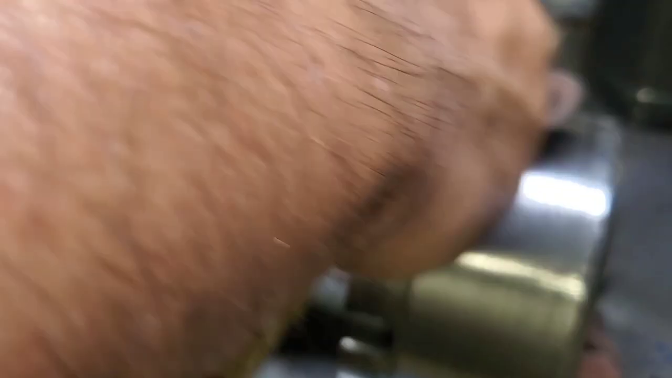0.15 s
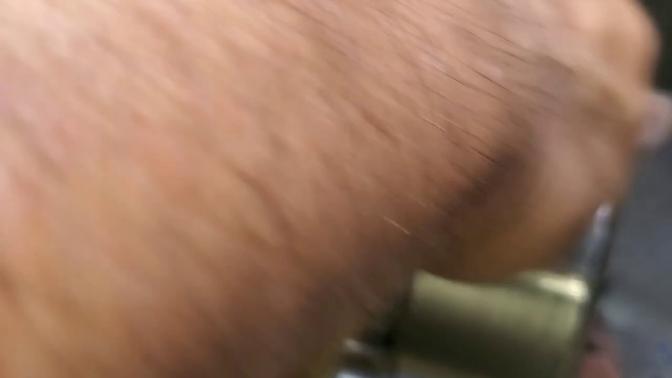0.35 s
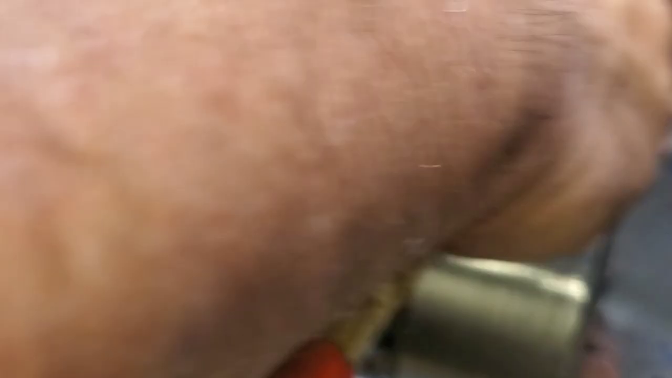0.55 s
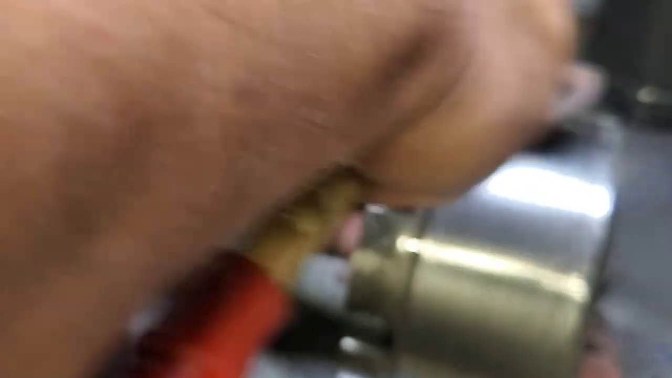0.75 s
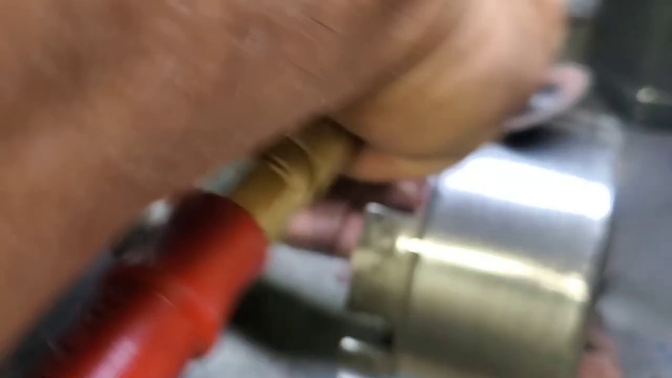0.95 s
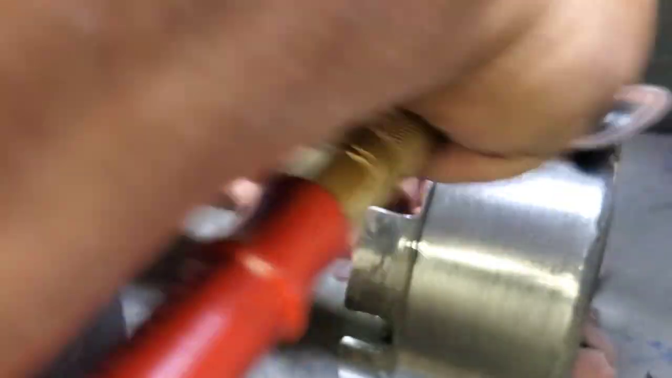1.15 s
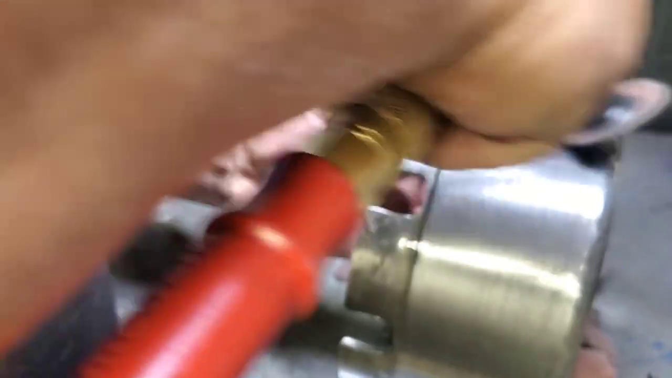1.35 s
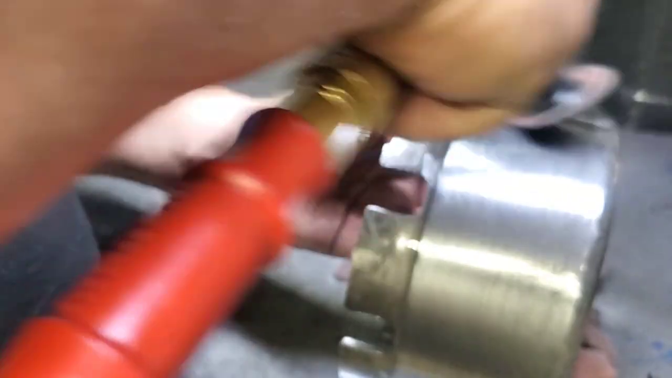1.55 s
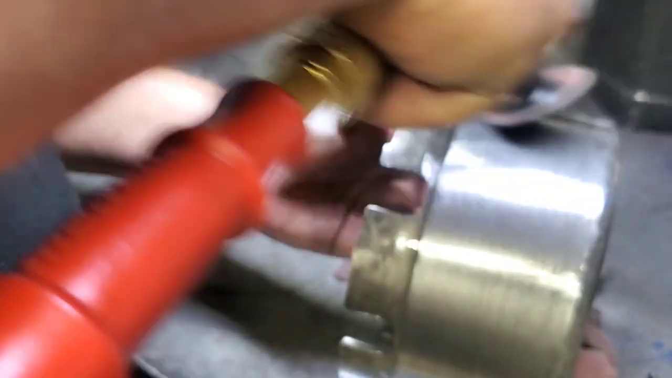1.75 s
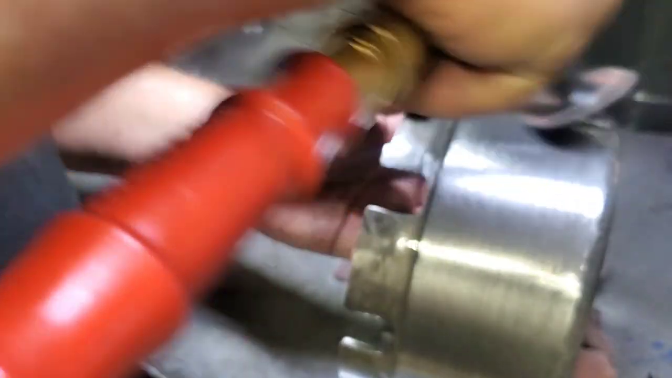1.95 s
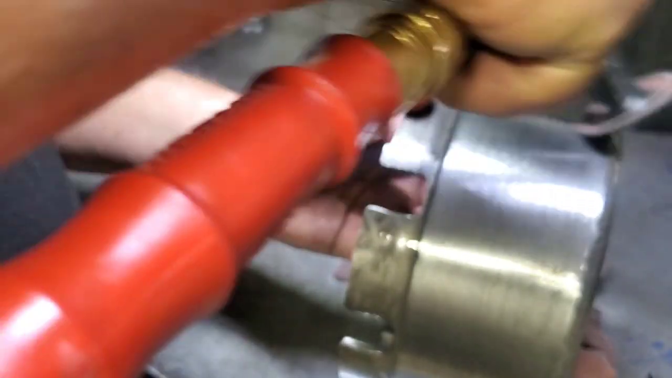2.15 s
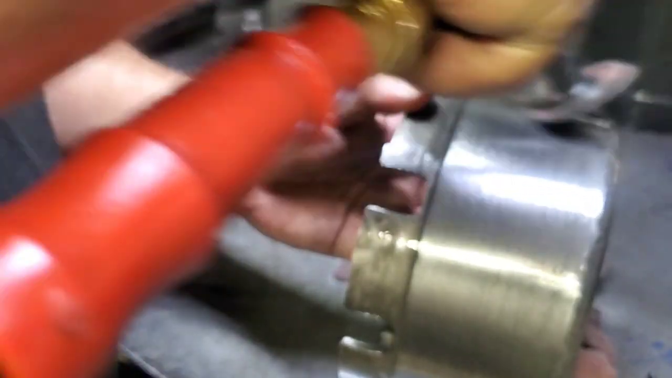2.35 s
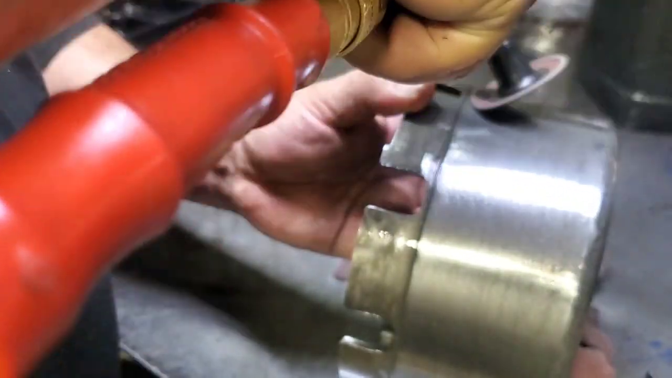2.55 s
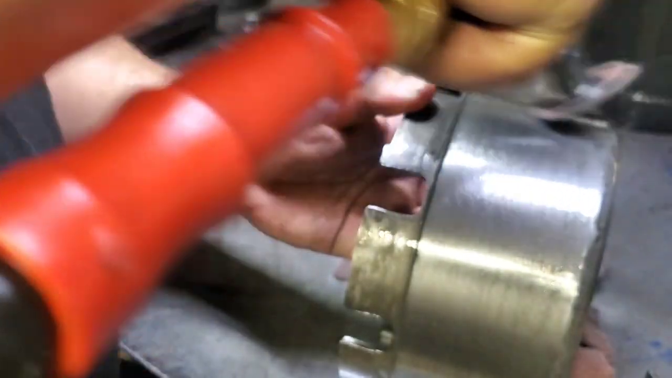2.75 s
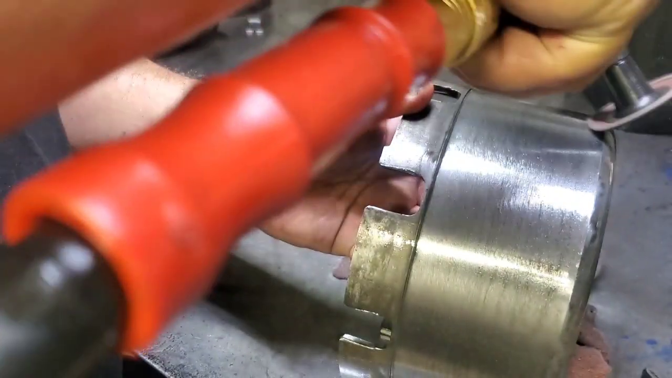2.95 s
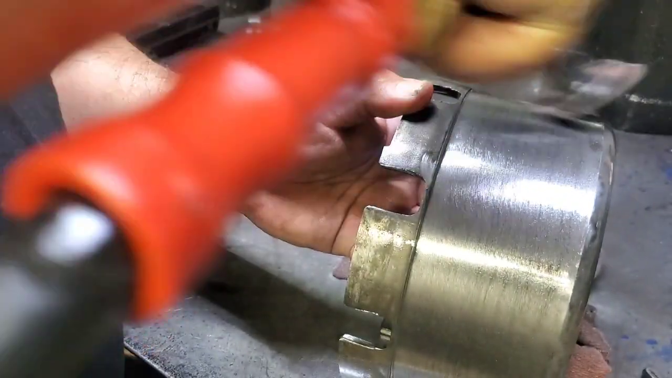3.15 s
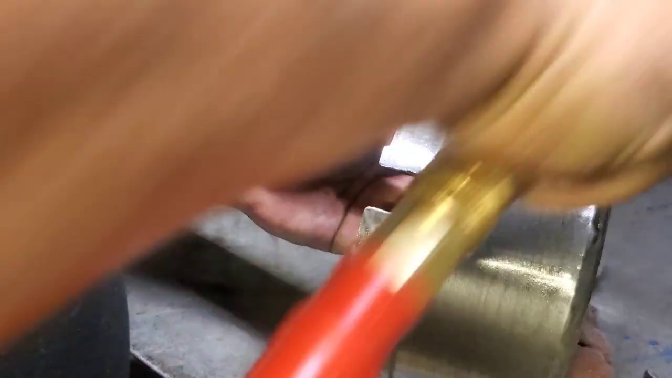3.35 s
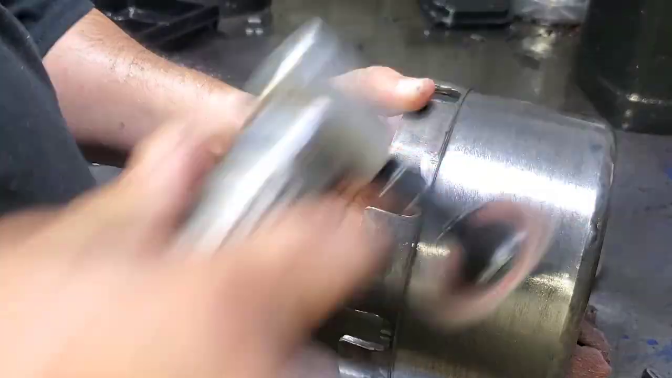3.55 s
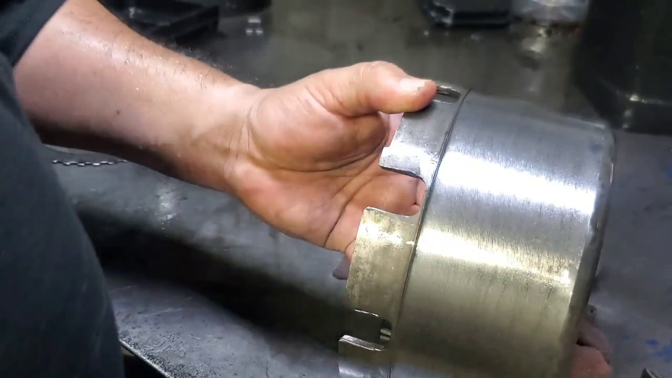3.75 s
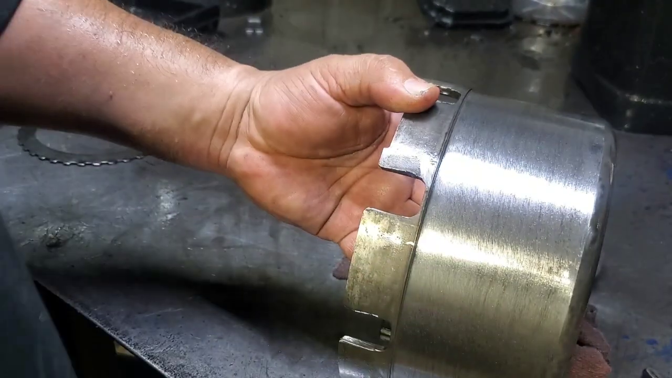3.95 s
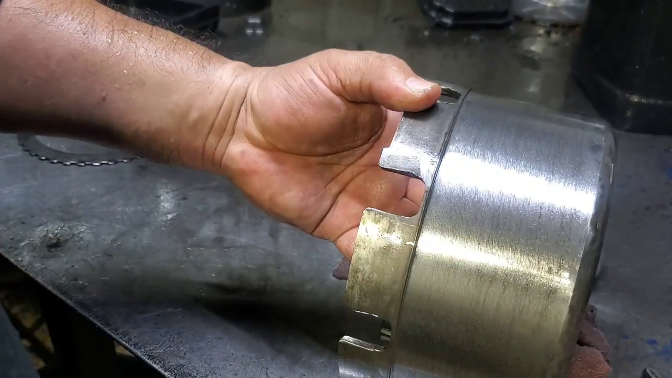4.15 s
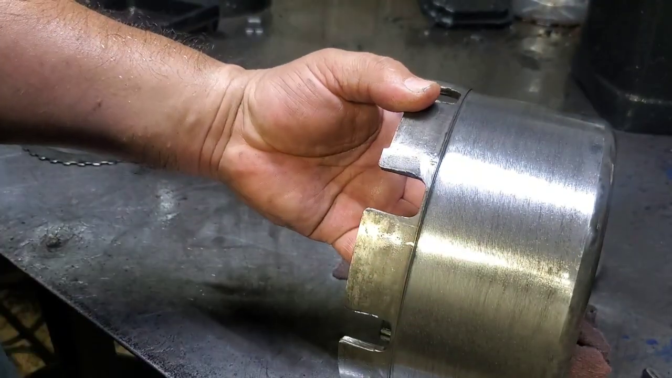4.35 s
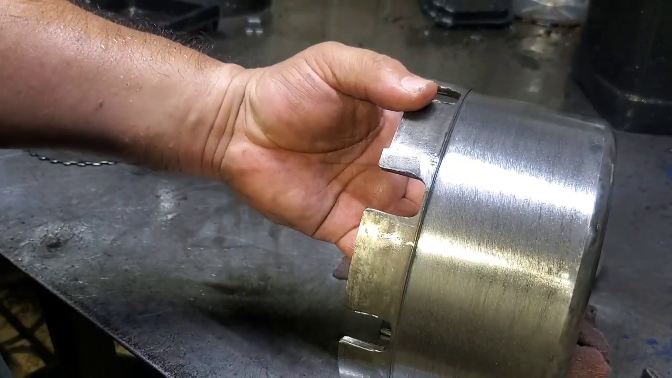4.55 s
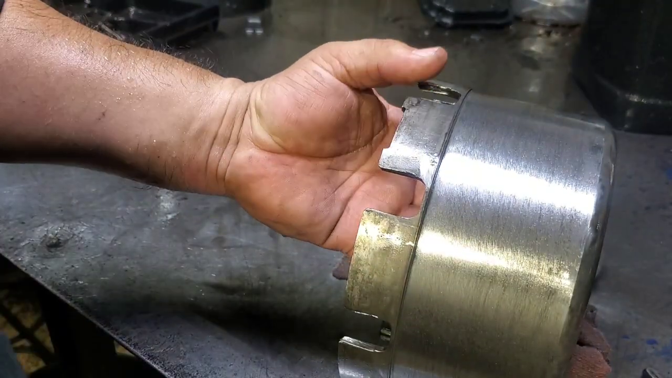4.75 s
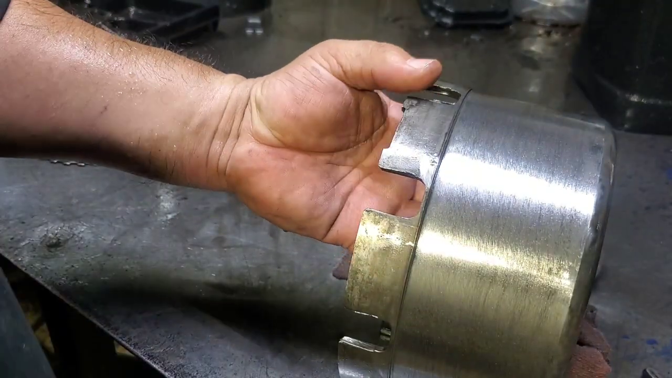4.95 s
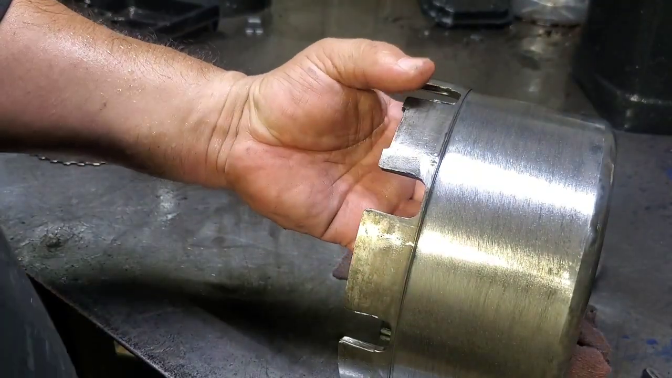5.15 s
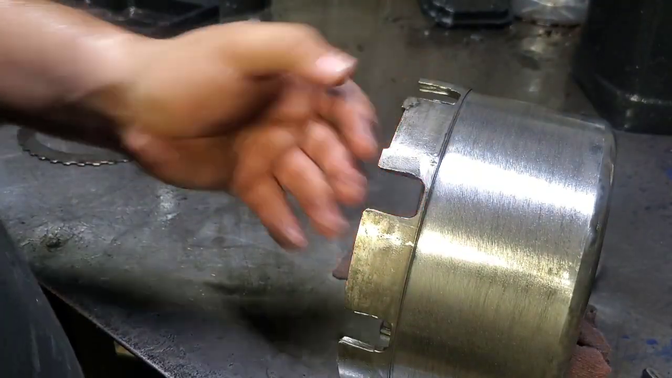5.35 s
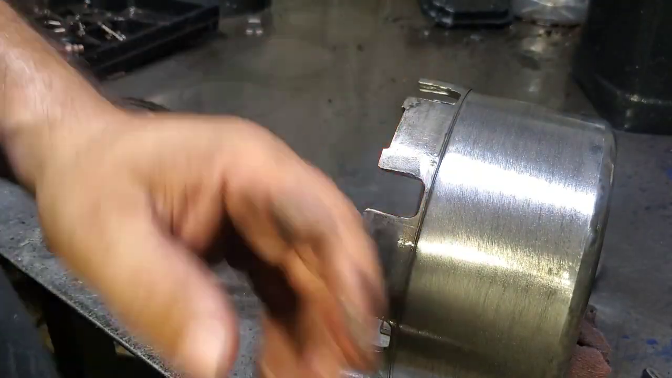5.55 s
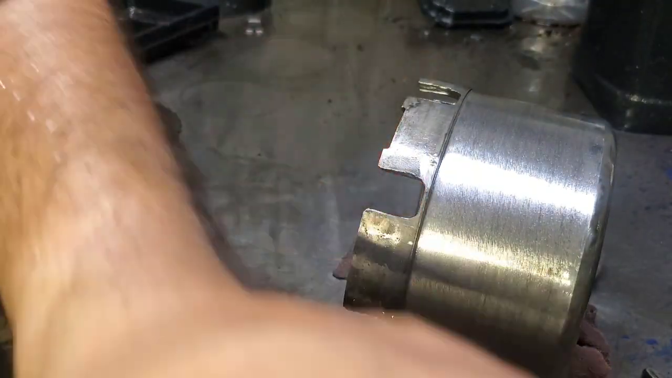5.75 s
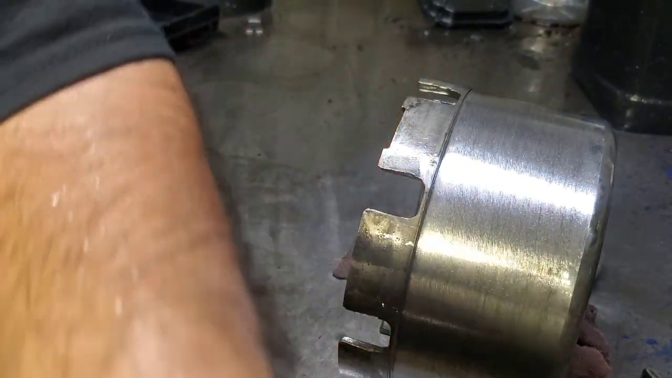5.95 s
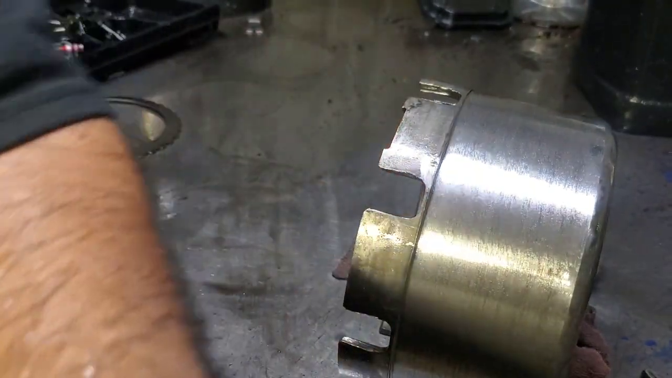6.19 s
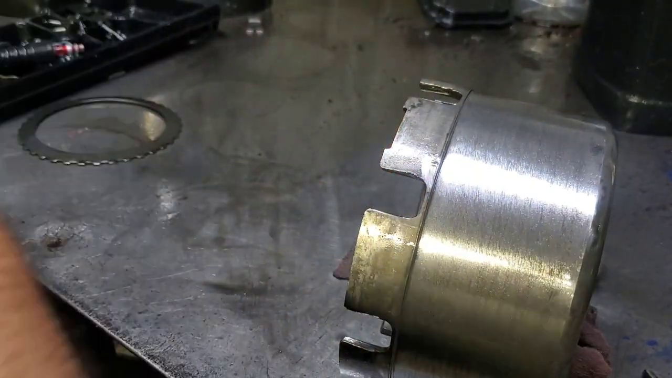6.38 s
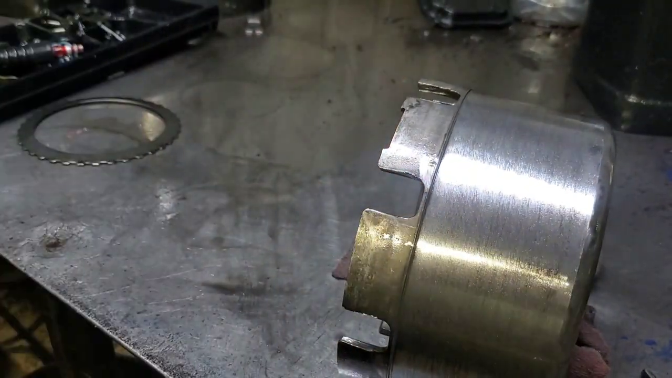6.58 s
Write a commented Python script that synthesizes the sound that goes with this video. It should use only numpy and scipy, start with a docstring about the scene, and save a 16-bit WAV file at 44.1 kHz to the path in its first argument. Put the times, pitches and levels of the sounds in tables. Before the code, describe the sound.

From 0 s a close air-driven grinder is at full noise on a steel drum: a harsh, nasal vane whine around 400 to 550 Hz with strong overtones, dipping and surging irregularly two to four times a second as pushes load it. Gritty abrasive hiss and bright exhaust jet swell with the strokes. Until about 1 s the sound is a little duller, screened by the forearm; then it opens up, with sizzle and soft low air puffs on the left until 2.9 s. At 3.28 s the lever is released; whine and hiss collapse, air bleeds away, and loose vanes rattle ever slower, with a brighter clatter near 3.9 s, ending by 4.25 s. Quiet follows. From roughly 4.5 to 5 s automatic gain raises the workshop's steady hiss and rumble, leaning left. Small scuffs come at 5.8 s and 5.9 to 6.5 s, with a barely audible low hum.

```python
"""In a workshop, an air die grinder is swept to and fro over a steel drum against far hiss and rumble.
Pushes load the vane motor, so its whine, a sum of sines locked to the rotor's phase, dips.
Exhaust air and abrasive hiss, noise chopped at the vane rate, lie above it; low puffs cross the microphone.
The lever is let go, the air bleeds off and loose vanes rattle as the rotor coasts. After a pause the
recorder turns its gain up, bringing out the workshop's rumble and hiss, a few scuffs and a faint low hum."""
import sys
import numpy as np
from scipy import signal
from scipy.fft import rfft, irfft, next_fast_len
from scipy.io import wavfile
from scipy.ndimage import uniform_filter1d, map_coordinates

SR = 44100
rng = np.random.default_rng(int(sys.argv[2]) if len(sys.argv) > 2 else 0)


def log_audio(samples):
    """Write samples as a 16-bit WAV file to the path given in sys.argv[1]."""
    # one column per channel
    frames = np.atleast_2d(samples).T
    # limit to full scale, then quantise
    limited = np.clip(frames, -1, 1)
    pcm = np.round(limited * 32767).astype(np.int16)
    wavfile.write(sys.argv[1], SR, pcm)


N = 291942
TIME = np.arange(N) / SR   # s
SIDES = np.array([[1], [-1]])   # left, right


def amp(db):
    """Decibel law: 20 dB is a tenfold amplitude."""
    return 10 ** (np.asarray(db) / 20)


def rms_one(x):
    """Energy normalization: the root mean square becomes 1."""
    return x / np.sqrt(np.mean(x ** 2) + 1e-20)


def in_time(rows):
    """Linear interpolation of each column against time, sample by sample."""
    s, *columns = np.transpose(rows)
    return [np.interp(TIME, s, column) for column in columns]


def at_hz(points, hz):
    """Interpolation of a spectrum on a logarithmic frequency axis."""
    table_hz, values = np.array(points).T[:2]
    return np.interp(np.log(hz + 1), np.log(table_hz), values)


def drift(rate_hz):
    """Slow random modulation: low-passed white noise of rms 1."""
    step = 40   # samples between the slow values
    r = np.exp(-2 * np.pi * rate_hz * step / SR)
    white = rng.standard_normal(N // step + 2002)
    slow = signal.lfilter([1], [1, -2 * r, r * r], white)[2000:]   # past the filter's onset
    return np.interp(np.arange(N) / step, np.arange(len(slow)), rms_one(slow))


def noise(spectrum, likeness, balance):
    """Partial coherence: shared and opposed noise make a coloured stereo field of rms 1."""
    size = next_fast_len(N)
    hz = np.arange(size // 2 + 1) * SR / size
    mid, side = rfft(rng.standard_normal((2, size))) * amp(at_hz(spectrum, hz))
    alike = np.clip(at_hz(likeness, hz), 0, 1)
    both = np.sqrt(1 + alike) * mid + np.sqrt(1 - alike) * side * SIDES
    both *= amp(SIDES * at_hz(balance, hz) / 2)
    return rms_one(irfft(both, size)[:, :N])


def band(hz, width, alike):
    """Resonance: stereo noise passes twice through one damped pole pair; rms 1."""
    r = np.exp(-np.pi * width / SR)
    mid, side = rng.standard_normal((2, N))
    x = mid + np.clip(1 - alike, 0, 1) * side * SIDES
    section = [1, 0, -1, 1, -2 * r * np.cos(2 * np.pi * hz / SR), r * r]
    return rms_one(signal.sosfilt([section, section], x))


def placed(x, pan_db, lead_ms):
    """Interaural level and time difference: a positive pan and lead favour the left."""
    late = map_coordinates(x[1], [np.arange(N) - lead_ms * SR / 1000], order=3, mode="nearest")
    return np.array([x[0] * amp(pan_db / 2), late * amp(-pan_db / 2)])


# background levels: t/s, leak level/dB, rumble level/dB
BACKGROUND = [(0, -43, -54), (1, -59, -50), (3.2, -70, -56), (3.7, -54, -52), (4.4, -55.5, -57.5),
              (5.1, -54.5, -57), (5.9, -55, -54.5), (6.25, -55.5, -58.5), (6.62, -62, -63)]
# noise colours: f/Hz, relative level per Hz/dB
SHOP_HISS_SPECTRUM = [(76, -28), (130, 4.5), (318, -2), (400, -6), (520, -14.5), (680, -2), (1000, -1.5),
                      (1350, -2), (1600, 0.5), (2020, 5.5), (2800, 3), (3490, -1.5), (3960, 3), (5500, -11),
                      (7150, -37)]
AIR_LINE_LEAK_SPECTRUM = [(3000, -19), (5000, -3), (5700, -8), (6900, 1.5), (8200, -6), (9100, -1),
                          (11000, -6), (13500, -4), (15200, -4), (16500, -6.5)]
RUMBLE_SPECTRUM = [(15, -38), (30, -3), (70, -3), (110, -4.5), (160, -32), (300, -25.5)]
# left-right likeness of the shop: f/Hz, likeness (1 = identical)
SHOP_LIKENESS = [(60, 1), (400, 0.99), (1000, 0.78), (2000, 0.44), (4000, 0.21), (8000, 0.051)]
# balance of the shop noise: f/Hz, left minus right level/dB
SHOP_BALANCE = [(60, 1), (110, -0.5), (200, 0), (380, 5), (700, 1), (1290, 2), (2380, 2.5), (4400, 2.5),
                (8120, 4.5), (15000, 4.5)]
# far machines: f/Hz, mean peak level/dB
SHOP_TONES = [(1027, -63.5), (31.3, -67.5)]
# breathy bands in the hiss: f/Hz, width of one resonance/Hz, level before the lean/dB, late loss/dB
SHOP_BANDS = [(2810, 81, -67.5, 0.1), (4030, 400, -66, 8), (1970, 400, -70, 0.1)]
# scuffs on the bench and a faint low hum near 363 Hz:
# centre t/s, length/s, f/Hz, width of one resonance/Hz, level before the lean/dB
SCUFFS_AND_HUM = [(5.79, 0.068, 1100, 1200, -50), (5.798, .04, 377, 140, -61), (6.1, 0.5, 1866, 380, -56),
                  (6.1, 0.5, 2850, 350, -57.5), (6.376, 0.03, 350, 1200, -53),
                  (6.448, 0.25, 2344, 370, -59), (6.52, 0.3, 40, 70, -58), (6.05, 0.45, 363, 30, -72)]
SHOP_HISS_DB, BANDS_SHIFT_S = -52.5, 4.4
SHOP_PAN_DB, SHOP_LEAD_MS = 6, 0.28   # the pan leans the bands, scuffs and hum; the lead serves all layers


def workshop():
    """Superposition: coloured noises, wavering tones, breathy bands, short swells of scuffing and hum."""
    leak_db, rumble_db = in_time(BACKGROUND)
    lean = amp(SIDES * SHOP_PAN_DB / 2)
    out = amp(SHOP_HISS_DB + .6 * drift(8)) * noise(SHOP_HISS_SPECTRUM, SHOP_LIKENESS, SHOP_BALANCE)
    out += amp(leak_db + .8 * drift(8)) * noise(AIR_LINE_LEAK_SPECTRUM, SHOP_LIKENESS, SHOP_BALANCE)
    out += amp(rumble_db + 2 * drift(14)) * noise(RUMBLE_SPECTRUM, SHOP_LIKENESS, SHOP_BALANCE)
    for hz, level_db in SHOP_TONES:
        out += amp(level_db + 1.5 * drift(6)) * np.sin(2 * np.pi * hz * TIME + .5 * drift(4))
    late = np.clip((TIME - BANDS_SHIFT_S) / .1, 0, 1)
    for hz, width, level_db, lost_db in SHOP_BANDS:
        out += lean * amp(level_db - lost_db * late + drift(8)) * band(hz, width, alike=.6)
    for centre_s, length_s, hz, width, level_db in SCUFFS_AND_HUM:
        swell = np.exp(-((TIME - centre_s) / (length_s / 2)) ** 4)
        out += lean * amp(level_db + 2.2 * drift(90)) * swell * band(hz, width, alike=.6)
    return placed(out, 0, SHOP_LEAD_MS)


# exhaust puffs across the left microphone port: t one puff half-width before the crest/s, crest level/dB
PUFFS = [(1.011, -37), (1.203, -41), (1.348, -42.5), (1.444, -42), (1.62, -39.5), (1.814, -37.5),
         (2.04, -41), (2.263, -42), (2.364, -40), (2.6, -37), (2.811, -33.5)]
# colour of a puff: f/Hz, relative level per Hz/dB
PUFF_SPECTRUM = [(20, -35), (50, -8), (85, -3), (130, -14), (220, -17), (400, -56)]
PUFF_S, PUFF_PAN_DB = 0.03, 23   # Gaussian half-width at 1/e; left minus right


def puffs():
    """Turbulent pressure at a port: Gaussian gusts gate low noise, mostly unlike on the two sides."""
    gust = sum(amp(db) * np.exp(-((TIME - s - PUFF_S) / PUFF_S) ** 2) for s, db in PUFFS)
    likeness = [(20, 0.31), (400, 0.37)]
    return gust * noise(PUFF_SPECTRUM, likeness, [(20, PUFF_PAN_DB), (400, PUFF_PAN_DB)])


# speed targets, dipping as pushes load the motor: t/s, vane rate before smoothing f/Hz
SPEED = [(0, 460.5), (0.048, 354), (0.14, 549), (0.19, 641), (0.284, 482.7), (0.328, 448.7), (0.368, 461.3),
         (0.44, 576.5), (0.532, 420), (0.58, 412.4), (0.658, 441.8), (0.696, 511.6), (0.75, 547),
         (0.8, 483.4), (0.858, 308), (0.926, 406.6), (0.98, 516.5), (1.034, 430), (1.1, 228.3),
         (1.134, 296), (1.2, 468), (1.248, 552.5), (1.324, 401.6), (1.366, 349.8), (1.42, 461),
         (1.504, 550), (1.566, 471.5), (1.596, 438.4), (1.7, 513), (1.782, 543), (1.872, 427.3),
         (1.89, 407), (1.946, 508), (2.028, 561), (2.062, 577.4), (2.11, 499), (2.148, 463.6), (2.24, 555),
         (2.342, 519), (2.384, 490), (2.424, 408.3), (2.5, 490), (2.558, 542), (2.61, 501), (2.654, 422.3),
         (2.686, 383.5), (2.768, 441.5), (2.828, 526), (2.9, 470.7), (2.95, 415.6), (3.098, 539),
         (3.152, 497), (3.19, 458.5), (3.236, 305.7), (3.26, 259.2), (3.306, 366.6), (3.33, 336)]
COAST_S, CRAWL_HZ = .28, 70   # time constant of the sinking rate and the vane rate it nears
VANES = 4


def vane_rate():
    """Rotor inertia: speed changes are rounded, and the free rotor sinks exponentially to a crawl."""
    hz, = in_time(SPEED)
    coast = np.exp(-np.maximum(TIME - SPEED[-1][0], 0) / COAST_S)
    hz = CRAWL_HZ + (hz - CRAWL_HZ) * coast
    return uniform_filter1d(hz, int(0.026 * SR)) * (1 + 0.00263 * drift(26.7))


# grinding strokes, of which only the departure from the mean is used: t/s, level/dB
STROKE_SWELL = [(0.0, -25), (0.14, -23), (0.17, -21), (0.36, -22.5), (0.37, -23.5), (0.59, -22.5),
                (0.63, -27), (0.76, -22.5), (0.89, -27), (0.93, -22), (1.14, -25), (1.24, -21), (1.36, -25),
                (1.45, -21.5), (1.67, -25), (1.7, -20.5), (1.9, -25.5), (1.95, -21.5), (2.18, -24.5),
                (2.25, -21), (2.41, -26.5), (2.52, -21), (2.66, -26.5), (2.8, -22), (2.91, -26.5),
                (3.08, -22.5), (3.18, -29), (3.3, -25.5)]
# one entry each for rasp, grinding hiss, sizzle, jet: level at the mean swell at t = 0/dB
AIR_DB = [-25.5, -25, -29.5, -22.5]
# sinking while the lever is held/(dB/s)
AIR_SINK_DB_PER_S = [1.47, -0.49, -1.8, -0.5]
# share of the stroke swell: behind the forearm, then in the open
FOLLOWS_SCREENED = [0.055, 0.92, 0.27, 0.089]
FOLLOWS_OPEN = [-0.69, 0.9, 1.84, 0.37]
# once the air is off: drop/dB, time constant of the drop/s, further fade/(dB/s)
AIR_DROP_DB = [6.5, 11, 14, 27]
AIR_DROP_S = [0.04, 0.076, 0.027, 0.14]
AIR_FADE_DB_PER_S = [4.7, 21, 25.4, 8.3]
LEVER_S = 3.282   # the lever is let go


def air_levels(clear):
    """Exponential relaxation: layers swell with the strokes, then drop and fade with the supply off."""
    swell_db, = in_time(STROKE_SWELL)
    swell_db = swell_db - np.mean(swell_db[TIME < LEVER_S])
    off = np.maximum(TIME - LEVER_S, 0)
    rows = zip(AIR_DB, AIR_SINK_DB_PER_S, FOLLOWS_SCREENED, FOLLOWS_OPEN,
               AIR_DROP_DB, AIR_DROP_S, AIR_FADE_DB_PER_S)
    levels = []
    for db, sink, screened, bare, drop, drop_s, fade in rows:
        held_db = db - sink * (TIME - off) + ((1 - clear) * screened + clear * bare) * swell_db
        levels.append(held_db - drop * (1 - np.exp(-off / drop_s)) - fade * off)
    return levels


# air noise colours: f/Hz, relative level per Hz/dB
RASP_SPECTRUM = [(30, -49), (120, -30), (300, -7), (600, -2.5), (800, -2.5), (1100, 5.5), (1300, 1.5),
                 (1600, 8.5), (1900, 8), (2200, 3.5), (2800, -7.5)]
GRIND_SPECTRUM = [(1290, -46), (2200, -65), (2430, -10), (3180, -3), (4490, -3.5), (5500, -11.5),
                  (7150, -55), (12100, -120)]
# the same while the forearm screens the tool
GRIND_SPECTRUM_SCREENED = [(1290, -54), (2200, -7.5), (2840, -2), (3130, 2), (3880, -6), (4220, -2.5),
                           (5040, -7), (5500, -58), (7150, -42), (12100, -120)]
SIZZLE_SPECTRUM = [(3500, -27.5), (4500, -1), (5500, 6.5), (6300, 2), (7200, -3), (9000, -49)]
JET_SPECTRUM = [(4100, -34), (7000, -2.5), (7630, -2), (10800, 4), (13400, 2), (15100, 7), (16500, 0)]
# left-right likeness of the tool's air: f/Hz, likeness (1 = identical)
TOOL_LIKENESS = [(100, 0.45), (400, 1), (1000, 0.35), (2000, 0.17), (4000, 0.57), (8000, 0.02)]
# balance of the tool, for its air and its tones: f/Hz, left minus right level/dB
TOOL_BALANCE = [(60, 18), (110, 4.5), (200, -2.5), (380, 2.5), (700, 0.5), (1290, 2), (2380, 0.5),
                (4400, 2), (8120, -1.5), (15000, -1)]
# drum ringing under the stone: f/Hz, width of one resonance/Hz, level over the grinding hiss/dB
DRUM_BANDS = [(3400, 220, -7.5), (3900, 140, -13), (2950, 130, -13)]
SCREENED_DRUM_DB = -5   # the drum is duller behind the forearm


def air_noise(levels, turn, pressure, clear):
    """Amplitude modulation: passing vanes chop the exhaust and abrasive noise while air is supplied."""
    rasp_db, grind_db, sizzle_db, jet_db = levels

    def tool(colour):
        return noise(colour, TOOL_LIKENESS, TOOL_BALANCE)

    rasp = amp(rasp_db + 2 * drift(25)) * tool(RASP_SPECTRUM)
    grind = np.sqrt(1 - clear) * tool(GRIND_SPECTRUM_SCREENED) + np.sqrt(clear) * tool(GRIND_SPECTRUM)
    grind *= amp(grind_db + 0.51 * drift(3.2))
    for band_hz, width, level_db in DRUM_BANDS:
        drum_db = grind_db + level_db + SCREENED_DRUM_DB * (1 - clear) + 3 * drift(5)
        grind += amp(drum_db) * band(band_hz, width, alike=.6)
    grind += amp(sizzle_db + drift(6)) * tool(SIZZLE_SPECTRUM)
    jet = amp(jet_db + 1.3 * drift(8)) * tool(JET_SPECTRUM)
    vane_wave = pressure * np.cos(VANES * turn)
    fading = np.clip((4.2 - TIME) / 0.99, 0, 1)   # the last air leaks away
    return fading * ((1 + .3 * vane_wave) * (rasp + grind) + (1 + .15 * vane_wave) * jet)


# rattle: f/Hz, width of one resonance/Hz, level before fade and knock/dB, fade/(dB/s), gain in the swing/dB
RATTLE_BANDS = [(1695, 330, -29.5, 52, -4), (2540, 720, -30, 35, 9.5), (3460, 1200, -32.5, 49, 18.5),
                (5860, 500, -33.5, 57, 0.1)]
SWING_S, SWING_LENGTH_S, REST_S = 3.913, 0.5, 4.1   # the tool swings past; the rattle starts to end


def vane_rattle(turn, pressure):
    """Impact excitation: loose vanes knock once a turn and drive noisy resonances in the run-down."""
    turns_since_knock = turn / (2 * np.pi) % 1
    knock = np.exp(-turns_since_knock / 1.2) * amp(drift(20) + 1.5 * SIDES)
    knock *= (1 - pressure) * np.clip(1 - (TIME - REST_S) / 0.16, 0, 1)
    swing = np.exp(-((TIME - SWING_S) / SWING_LENGTH_S * 2) ** 2)
    out = np.zeros((2, N))
    for band_hz, width, level_db, fade, swing_db in RATTLE_BANDS:
        level_db = level_db - fade * np.maximum(TIME - LEVER_S, 0) + swing_db * swing
        out += knock * amp(level_db) * band(band_hz, width, alike=0.16)
    return out


# muffler response in the open, then behind the forearm: f/Hz, level/dB
MUFFLER_OPEN = [(230, -27.5), (400, -28.5), (520, -25.5), (620, -24), (800, -28), (930, -31), (1020, -25.5),
                (1120, -20.5), (1200, -28.5), (1290, -30), (1400, -19), (1590, -14.5), (1750, -15.5),
                (1950, -22.5), (2300, -18.5)]
MUFFLER_SCREENED = [(230, -29), (400, -28), (520, -24), (620, -24), (800, -25.5), (930, -29), (1020, -28.5),
                    (1150, -19.5), (1250, -27.5), (1350, -29), (1500, -20), (1620, -16.5), (1800, -18),
                    (1950, -18), (2300, -23)]


def muffler(hz, clear):
    """Transmission through a muffler: the gain in dB depends on frequency and on screening."""
    return (1 - clear) * at_hz(MUFFLER_SCREENED, hz) + clear * at_hz(MUFFLER_OPEN, hz)


# the vane tone and its 2nd to 4th harmonics, one entry each: level before the muffler at t = 0/dB
VANE_DB = [2.87, 3.1, -4.67, -11.5]
# sinking as the exhaust turns away/(dB/s)
VANE_SINK_DB_PER_S = [0.91, 1.08, 0.026, 0.85]
# loss as the grip on the lever slackens/dB
VANE_EASE_DB = [2, 3, 8, 3]
# drop once the air is off/dB
VANE_DROP_DB = [16, 16, 16, 18]
# weaker tones: multiple of the shaft rate; then level over the grinding hiss, before the housing/dB
SHAFT_ORDERS = [1, 2, 3, 5, 7, 9, 11, 13, 20, 24, 28, 32, 36, 40]
SHAFT_ORDER_DB = [-32, -26, -16, -17, -21.5, -19, -16, -12, -6.5, -6.5, -8, -8, -9, -10]
# housing response for the shaft orders: f/Hz, level/dB
HOUSING = [(200, -5), (1600, -4), (2300, -12), (2700, -7), (3050, -1), (3300, 3), (3600, -3), (3900, -2),
           (4300, -12), (5600, -12)]
# motor tones in the open, then behind the forearm: f/Hz, phase lead of the left/rad
LEAD_OPEN = [(0, 0.39), (860, 0.53), (1380, 1.26), (1640, 0.78), (2930, 0.15), (4740, 3.2)]
LEAD_SCREENED = [(0, 0.3), (1210, 1.13), (1550, 2.2), (1810, 0.27), (2410, 7.3), (3100, 4.6), (3790, 1.8),
                 (5000, 5.2)]
VANE_FADE_DB_PER_S = 70   # once the lever is let go
STALL_HZ, STALL_DB_PER_HZ = 350, .045   # below this vane rate the vanes seal less and the whine thins
EASE_S, SHAFT_EASE_DB = 3.195, 2   # the grip slackens before the lever is let go
SCREENED_ORDERS_DB, PATCHY_DB = 3.5, 2.5   # extra level of the shaft orders while the forearm is in the way; they come and go


def motor_tones(hz, turn, grind_db, pressure, clear):
    """Fourier synthesis: vane harmonics and weaker shaft orders are wavering sines of the rotor phase."""
    eased = np.clip((TIME - EASE_S) / .04 + .5, 0, 1)
    weak_db = pressure * STALL_DB_PER_HZ * np.maximum(STALL_HZ - hz, 0)
    weak_db += VANE_FADE_DB_PER_S * np.maximum(TIME - LEVER_S, 0)
    orders = []   # multiple of the shaft rate, level in dB, gate
    vane_rows = zip(VANE_DB, VANE_SINK_DB_PER_S, VANE_EASE_DB, VANE_DROP_DB)
    for harmonic, (level, sink, ease, drop) in enumerate(vane_rows, start=1):
        level_db = level - sink * TIME + muffler(harmonic * hz, clear) - weak_db
        level_db += -ease * eased - drop * (1 - pressure) + 1.2 * drift(14)
        orders.append((VANES * harmonic, level_db, 1))
    for order, level in zip(SHAFT_ORDERS, SHAFT_ORDER_DB):
        level_db = level + grind_db + SCREENED_ORDERS_DB * (1 - clear) - SHAFT_EASE_DB * eased
        level_db += at_hz(HOUSING, order * hz / VANES) + PATCHY_DB * drift(6)
        orders.append((order, level_db, pressure))
    out = np.zeros((2, N))
    for order, level_db, gate in orders:
        order_hz = order * hz / VANES
        lead = (1 - clear) * np.interp(order_hz, *np.transpose(LEAD_SCREENED))
        lead += clear * np.interp(order_hz, *np.transpose(LEAD_OPEN))
        # reflections shift the sides apart
        wobble = np.sqrt(order) * (.1 * drift(30) + .08 * drift(15) * SIDES)
        lean_db = at_hz(TOOL_BALANCE, order_hz) / 2 * SIDES
        sine = np.sin(order * turn + wobble + SIDES * lead / 2)
        out += gate * np.sqrt(2) * amp(level_db + lean_db + drift(52)) * sine
    return out


# where the tool is: t/s, left minus right level/dB, lead of its air noise on the left/ms
PLACE = [(0, 2.5, 0.29), (.5, 2.5, 0.28), (.9, 2.5, 0.27), (1.1, 3.5, 0.056), (2, 3.5, .04),
         (3.3, 3, 0.021), (3.5, 1.5, 0.26), (4.4, 9, 0.34)]
ARM_CLEAR_S = 1.085   # the forearm is half out of the way


def grinder():
    """Common excitation: one rotor phase drives the motor tones, the chopped air and the rattle."""
    hz = vane_rate()
    pan_db, lead_ms = in_time(PLACE)
    turn = 2 * np.pi * np.cumsum(hz / VANES) / SR   # rotor angle in radians
    pressure = np.clip(1 - (TIME - LEVER_S) / 0.065, 0, 1)   # the lever shuts the air off
    clear = np.clip((TIME - ARM_CLEAR_S) / 0.59 + .5, 0, 1)   # the forearm moves out of the way
    levels = air_levels(clear)
    air = air_noise(levels, turn, pressure, clear) + vane_rattle(turn, pressure)
    tones = motor_tones(hz, turn, levels[1], pressure, clear)
    return placed(air, pan_db, lead_ms) + placed(tones, pan_db, 0)


def scene():
    """Linear superposition of workshop, puffs and tool."""
    return workshop() + puffs() + grinder()


QUIET_DB, HOLD_S = -28, 0.86   # level that counts as quiet, and how long it must last
RISE_DB_PER_S, BOOST_DB, SETTLE_S = 50.5, 19, 0.24   # climb before smoothing, its limit, smoothing time
CEILING, CUTOFF_HZ = 0.9, 15750


def record(dry):
    """Automatic gain control: lasting quiet raises the gain; peaks are rounded and the top is cut."""
    power = uniform_filter1d(np.mean(dry ** 2, axis=0), int(.05 * SR))
    loud = power > amp(QUIET_DB) ** 2
    quiet_for = TIME - np.maximum.accumulate(TIME * loud)
    target_db = np.clip((quiet_for - HOLD_S) * RISE_DB_PER_S, 0, BOOST_DB)
    r = np.exp(-1 / (SETTLE_S * SR))
    boost_db = signal.lfilter([1 - r], [1, -r], target_db)
    rounded = CEILING * np.tanh(dry * amp(boost_db) / CEILING)
    low_pass = signal.ellip(14, .5, 100, CUTOFF_HZ, fs=SR, output="sos")
    return signal.sosfilt(low_pass, rounded)


dry = scene()
out = record(dry)
log_audio(out)
```